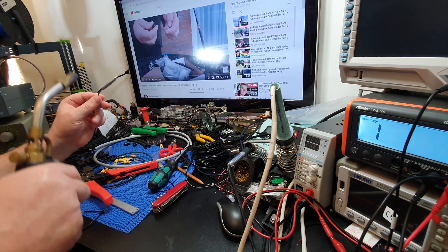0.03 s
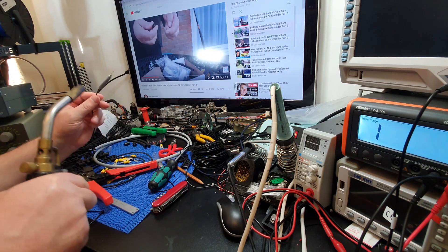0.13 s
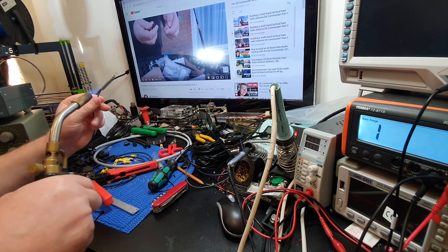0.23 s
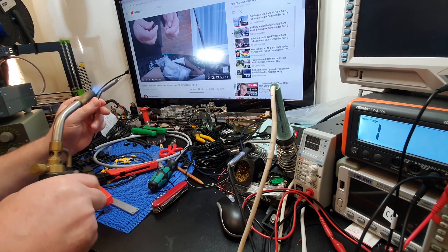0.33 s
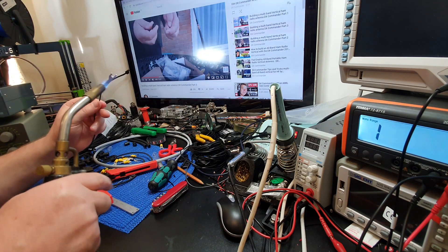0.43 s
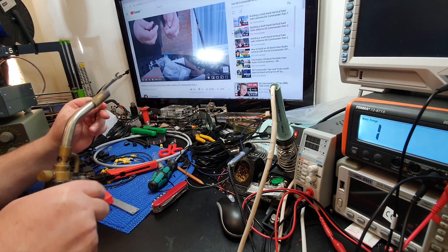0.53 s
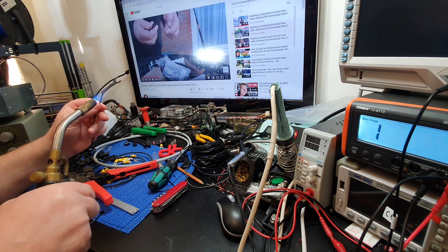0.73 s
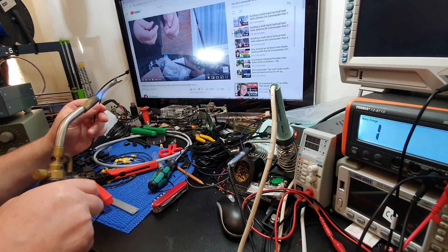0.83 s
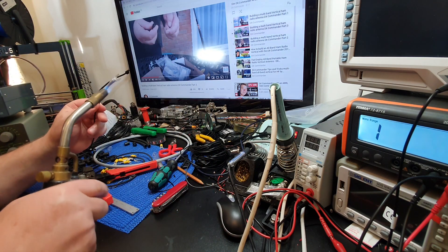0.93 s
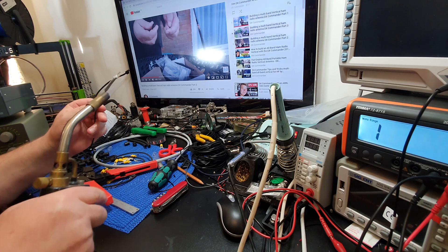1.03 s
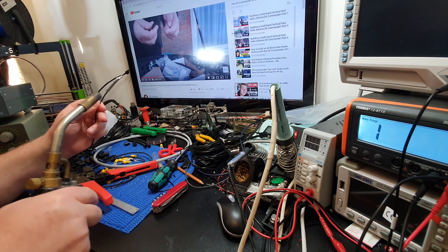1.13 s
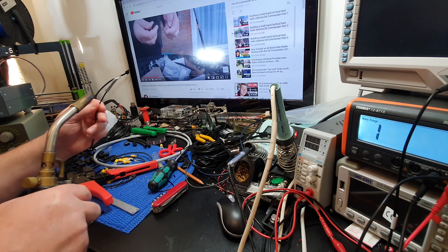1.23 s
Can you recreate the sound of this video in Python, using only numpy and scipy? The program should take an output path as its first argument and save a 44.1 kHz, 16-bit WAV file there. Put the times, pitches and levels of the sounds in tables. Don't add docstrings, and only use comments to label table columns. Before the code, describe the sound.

Two brief gas torch blasts, each hissing and roaring before dying fast, in a small room

```python
import sys
import numpy as np
from scipy import signal
from scipy.fft import rfft, irfft
from scipy.io import wavfile
from scipy.ndimage import uniform_filter1d, map_coordinates

SR = 44100
rng = np.random.default_rng(int(sys.argv[2]) if len(sys.argv) > 2 else 0)


def gain_from_db(level_db):
    decades = np.asarray(level_db, float) / 20
    return 10 ** decades


def bounce(signal):
    frames = np.transpose(np.atleast_2d(signal))
    limited = np.clip(frames, -1, 1)
    pcm = np.round(limited * 32767).astype(np.int16)
    wavfile.write(sys.argv[1], SR, pcm)


N = 57330
T = np.arange(N) / SR


def unit(x):
    return x / np.sqrt(np.mean(x ** 2))


def noise():
    return rng.standard_normal(N)


def colour(x, points):
    hz_points, db_points = np.array(points, float).T
    hz = np.maximum(np.arange(2049) * SR / 4096, 1)
    log_gain = np.interp(np.log(hz), np.log(hz_points), db_points) * np.log(10) / 20
    cepstrum = irfft(log_gain)
    cepstrum[1:2048] *= 2
    cepstrum[2049:] = 0
    impulse = irfft(np.exp(rfft(cepstrum)))
    return signal.fftconvolve(x, impulse)[:N]


def band(x, hz, width_hz):
    hz = min(hz, 0.45 * SR)
    return signal.lfilter(*signal.iirpeak(hz, hz / width_hz, fs=SR), x)


def resonances(x, modes):
    return sum(gain_from_db(db) * band(x, hz, width_hz) for hz, width_hz, db in modes)


def ring(x, modes):
    out = 0
    for hz, db, t60_s in modes:
        pole = np.exp(2j * np.pi * hz / SR - np.log(1000) / (t60_s * SR))
        out = out + gain_from_db(db) * signal.lfilter([1], [1, -pole], x).imag
    return out


def filtered(x, order, hz, kind="low"):
    return signal.sosfilt(signal.butter(order, hz, kind, fs=SR, output="sos"), x)


def walk(rate_hz):
    k = max(int(SR / rate_hz), 2)
    smooth = uniform_filter1d(rng.standard_normal(N), k)
    return unit(uniform_filter1d(smooth, k))


def push(at, length_s):
    return np.sin(np.pi * np.clip((T - at) / length_s, 0, 1)) ** 2


SAG_DB_S2 = 2204


def flow(on, off, attack_s, sag_db_s):
    rise = 1 - np.exp(-np.maximum(T - on, 0) / attack_s)
    late = np.maximum(T - off, 0)
    return rise * gain_from_db(-sag_db_s * late - SAG_DB_S2 * late ** 2)


# open_s, shut_s, gas_db, flame_db
BURSTS = [
    (0.155, 0.421, -37.5, -28.5),
    (.684, 0.911, -39, -28.5),
]
# frequency_hz, level_db (per Hz)
GAS_SPECTRUM = [(180, -46), (300, -30.5), (1080, 0.5), (1660, -32), (2250, -3.5), (2650, -8.5), (6000, 4.5),
                (8360, -10), (16000, -12.5)]
# frequency_hz, width_hz, level_db
NOZZLE = [(5100, 500, 9), (6050, 300, 12.5), (7400, 500, -21.5), (11600, 700, -1.5), (2240, 620, 7.5)]


def gas():
    n = noise()
    hiss = unit(colour(n, GAS_SPECTRUM)) + gain_from_db(-14) * unit(resonances(n, NOZZLE))
    envelope = sum(gain_from_db(db) * flow(on, off, attack_s=0.003, sag_db_s=160.5) for on, off, db, _ in BURSTS)
    return unit(hiss) * gain_from_db(1.3 * walk(200)) * envelope


LIGHTS_S = [.237, .6935]
# frequency_hz, level_db (per Hz)
FLAME_SPECTRUM = [(24, -48.5), (40, -5.5), (433, 0.5), (516, 3), (733, -5.5), (942, -1.5), (2500, -9.5),
                  (5050, -14), (16000, -44.5)]
# frequency_hz, width_hz, level_db
TUBE = [(302, 340, 6), (481, 40, 7), (920, 450, -10), (3150, 500, -18)]


def flame_flow(attack_s):
    out = 0
    for lit, (_, off, _, db) in zip(LIGHTS_S, BURSTS):
        out = out + gain_from_db(db) * flow(lit, off, attack_s, sag_db_s=80.5)
    return out


def flame():
    n = noise()
    roar = unit(colour(n, FLAME_SPECTRUM)) + gain_from_db(-9) * unit(resonances(n, TUBE))
    flutter_db = -2.77 * walk(29.6) - 2.5 * walk(159)
    low = filtered(roar, 2, 700)
    high = roar - low
    low_roar = low * gain_from_db(flutter_db + 0.31 * walk(44)) * flame_flow(attack_s=0.003)
    high_roar = high * gain_from_db(0.22 * flutter_db + 0.3 * walk(67.6)) * flame_flow(attack_s=0.0083)
    return low_roar + high_roar


# start_s, puff_db, length_s, room_boom_db
PUFFS = [
    (0.2395, -2, 0.0026, -20.5),
    (0.693, -11, 0.0027, -27),
    (0.794, -41, .004, -20.5),
]


def puffs():
    direct = -sum(gain_from_db(db) * push(at, length_s) for at, db, length_s, _ in PUFFS)
    drive = -sum(gain_from_db(boom_db) * push(at, length_s) for at, _, length_s, boom_db in PUFFS) / 20
    return filtered(direct, 1, 69, "high"), drive


SNAP_S = [.2354, .7963]
# crack_db, tail_db, tail_t60_s, bass_cut_hz
SNAPS = [
    (-9.5, -26, 0.15, 1400),
    (-9, -35, .12, 2300),
]
# frequency_hz, level_db (per Hz)
SNAP_SPECTRUM = [(410, -4.5), (700, -16), (1600, -4.5), (3200, -0.5), (4990, 0), (6830, 3), (8420, -5),
                 (12200, 4.5), (16000, -6.5)]


def snaps():
    crackle = noise() * gain_from_db(6.5 * rng.standard_normal(N))
    n = unit(colour(crackle, SNAP_SPECTRUM))
    out = 0
    for at, (crack_db, tail_db, t60_s, cut_hz) in zip(SNAP_S, SNAPS):
        late = np.maximum(T - at, 0)
        crack = gain_from_db(crack_db) * np.exp(-np.maximum(late - 0.0028, 0) / 0.001)
        tail = gain_from_db(tail_db - 60 * late / t60_s)
        onset = np.clip(late / 0.00041, 0, 1)
        out = out + filtered(n, 2, cut_hz, "high") * (crack + tail) * onset
    return out


# start_s, level_db, pitch_hz, width_hz
TICKS = [
    (0.017, -41, 3050, 6000),
    (.135, -35, 1170, 2000),
    (.412, -23, 10550, 2030),
    (.581, -40, 2100, 2000),
    (.643, -41.5, 1200, 1250),
    (0.906, -29.5, 10200, 3020),
    (1.118, -81.5, 2000, 1016),
    (1.174, -46, 2450, 2350),
]


def tick(n, at, db, hz, width_hz):
    late = np.maximum(T - at, 0)
    envelope = (1 - np.exp(-late / 0.00048)) * gain_from_db(db - 60 * late / 0.014)
    return band(unit(band(n, hz, width_hz)) * envelope, hz, width_hz)


def ticks():
    n = noise()
    out = 0
    for at, db, hz, width_hz in TICKS:
        out = out + tick(n, at, db, hz, width_hz) + tick(n, at, db - 7.5, hz, 3 * width_hz)
    return out


# start_s, level_db, contact_s
KNOCKS = [
    (1.172, -37, 0.00096),
    (1.175, -29, 0.0014),
    (1.19, -62, 0.0028),
    (1.212, -49, 0.0019),
    (1.237, -34.5, 0.00142),
    (1.251, -36, 0.00096),
]
# frequency_hz, level_db, t60_s
BENCH = [(57.7, 4.5, 0.21), (110, 8, 0.08), (202, -12.5, 0.04), (250, 0.5, 0.033), (373, -21.5, 0.039),
         (606, -13.5, 0.034), (820, -22, 0.033), (980, -16.5, 0.04)]
# start_s, level_db
PART_HITS = [
    (1.172, -29.5),
    (1.192, -32.5),
    (1.213, -35.5),
    (1.253, -48),
]
# frequency_hz, level_db, t60_s
METAL_PART = [(1253.6, -14, 0.1), (2020, -30.5, 0.032), (3310, -33, 0.037), (4000, -31, 0.031)]


def knocks():
    bench_force = sum(gain_from_db(db) * np.gradient(push(at, contact_s)) for at, db, contact_s in KNOCKS)
    part_force = sum(gain_from_db(db) * np.gradient(push(at, 0.00025)) for at, db in PART_HITS)
    return ring(bench_force, BENCH) + ring(part_force, METAL_PART)


# frequency_hz, level_db, t60_s
ROOM_MODES = [(57, -23, .35), (121.7, -6, 0.18), (201, -11.5, 0.24)]


def boom(drive, fire):
    return ring(drive + gain_from_db(-46) * fire, ROOM_MODES)


def pair(a, b):
    side = filtered(b, 2, 598, "high")
    return np.array([a + side, a - side]) / np.sqrt(2)


def tail(x):
    n = noise()[:SR // 2]
    t = T[:SR // 2]
    low = filtered(n, 1, 3000)
    decay = low * gain_from_db(-60 * t / 0.21) + (n - low) * gain_from_db(-60 * t / 0.2)
    impulse = decay * np.clip(t / 0.0091, 0, 1)
    return signal.fftconvolve(x, impulse / np.sqrt(np.sum(impulse ** 2)))[:N]


def room(x):
    return gain_from_db(-1.5) * pair(tail(x), tail(x))


# frequency_hz, level_db (per Hz)
LEAK_SPECTRUM = [(24, -42.5), (40, -12), (133, 2.5), (180, -16), (363, -3.5), (942, -17.5), (2150, -9.5),
                 (2570, -12.5), (16000, -29.5)]


def leak():
    hiss = pair(unit(colour(noise(), LEAK_SPECTRUM)), unit(colour(noise(), LEAK_SPECTRUM)))
    fade_db = 20 * np.maximum(T - 0.18, 0) / 0.062
    return hiss * gain_from_db(-50 + 0.5 * walk(31) - fade_db)


# frequency_hz, level_db (rms)
HUM = [(58, -63), (119.5, -55.5)]


def hum():
    out = 0
    for hz, db in HUM:
        tone = np.sqrt(2) * np.sin(2 * np.pi * (hz * T + rng.random()))
        out = out + gain_from_db(db + 0.84 * walk(22)) * tone
    return out


# frequency_hz, level_db (per Hz)
FLOOR_SPECTRUM = [(24, -33.5), (40, -6), (155, 0.5), (1370, -42), (2210, -32), (4800, -36.5), (6820, -23.5),
                  (9220, -43.5), (16000, -52)]


def room_floor():
    floor = pair(unit(colour(noise(), FLOOR_SPECTRUM)), unit(colour(noise(), FLOOR_SPECTRUM)))
    return floor * gain_from_db(-58.5 + 2.0 * walk(10))


def scene():
    fire = flame()
    puff, drive = puffs()
    near = gas() + fire + puff + snaps() + ticks() + knocks()
    port_lag_s, pan_db = 0.0002914, 3.4
    right = map_coordinates(near, [(T - port_lag_s) * SR], mode="nearest")
    direct = np.array([near * gain_from_db(pan_db / 2), right * gain_from_db(-pan_db / 2)])
    return direct + room(near) + boom(drive, fire) + leak() + hum() + room_floor()


def band_limit(x):
    return signal.sosfilt(signal.butter(12, 16510, fs=SR, output="sos"), x)


# frequency_hz, width_hz, level_db
HOUSING = [(2118, 130, 1), (3070, 410, -13), (5205, 350, -3.5), (6900, 370, -7)]


def record(dry):
    x = dry + resonances(dry, HOUSING)
    x = x - 0.27 * band(x, 7840, 220)
    x = filtered(x, 5, 45, "high")
    x = signal.sosfilt(signal.ellip(8, 0.2, 60, 15600, fs=SR, output="sos"), x)
    mix = 1.228 * np.tanh(x / 1.282)
    return band_limit(mix)


dry = scene()
out = record(dry)
bounce(out)
```